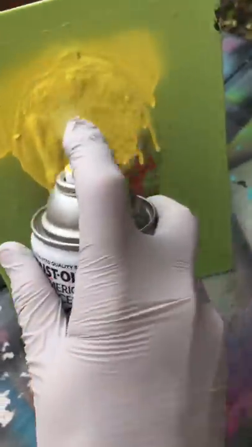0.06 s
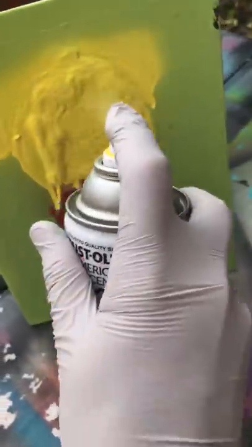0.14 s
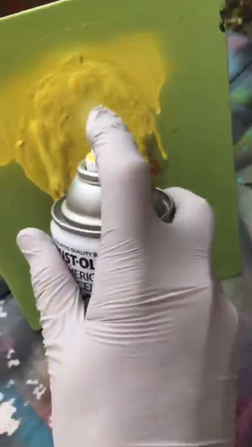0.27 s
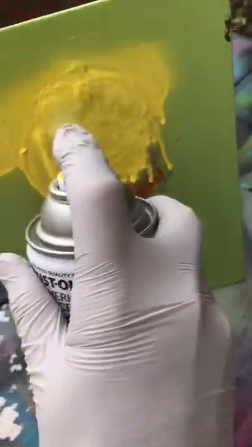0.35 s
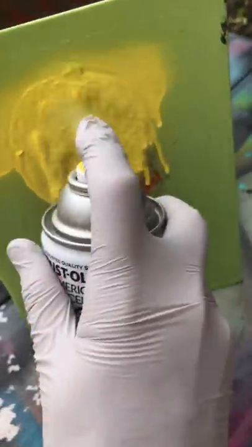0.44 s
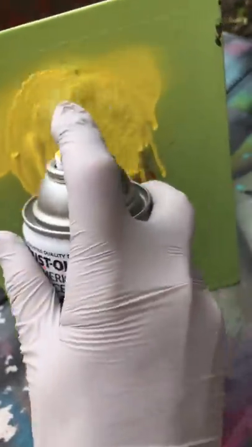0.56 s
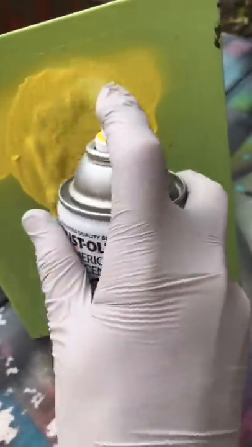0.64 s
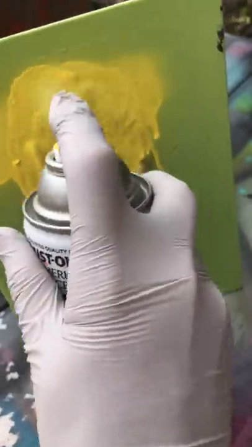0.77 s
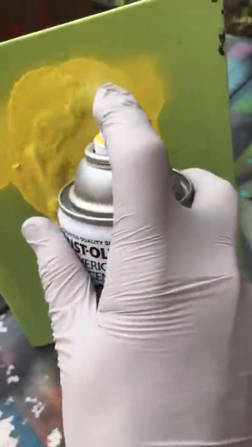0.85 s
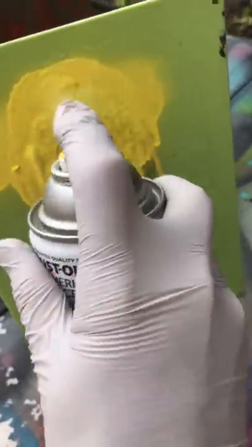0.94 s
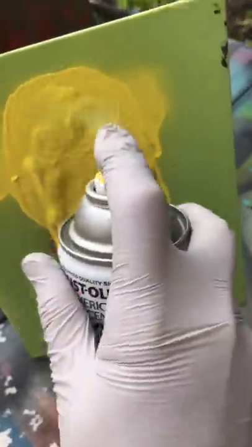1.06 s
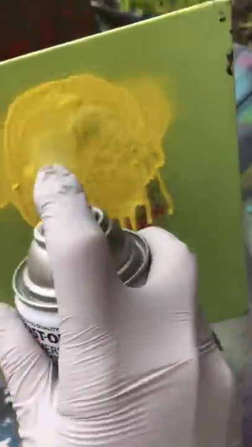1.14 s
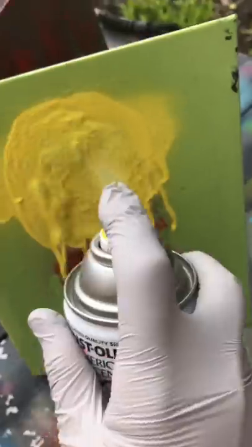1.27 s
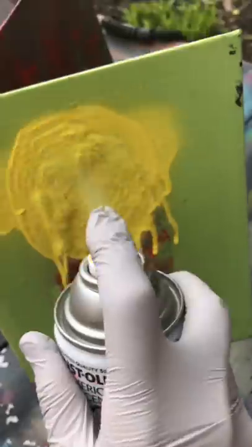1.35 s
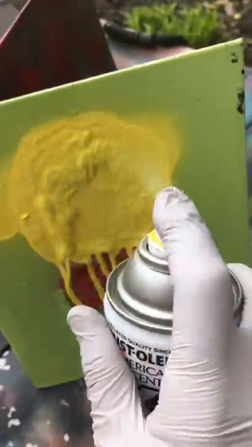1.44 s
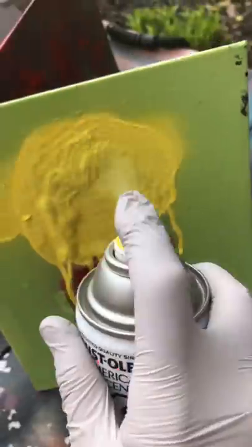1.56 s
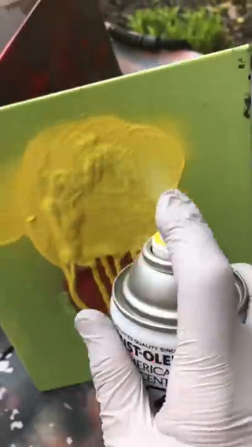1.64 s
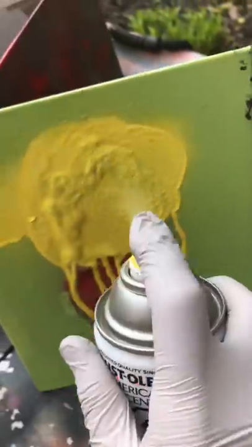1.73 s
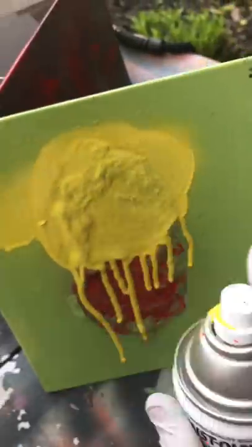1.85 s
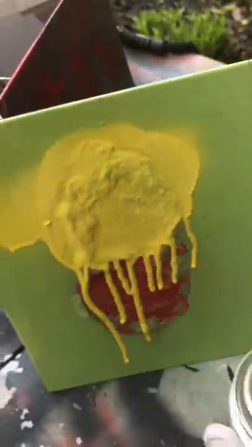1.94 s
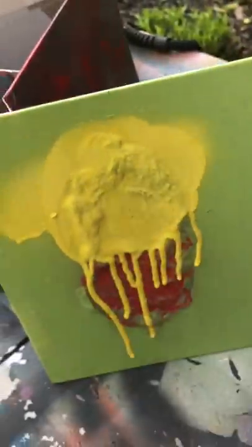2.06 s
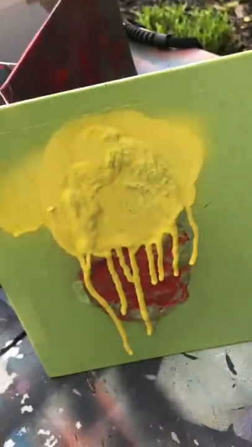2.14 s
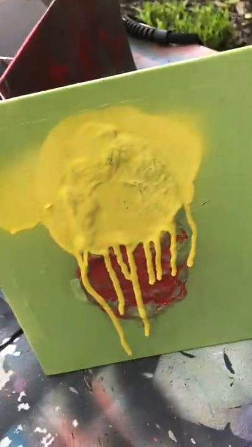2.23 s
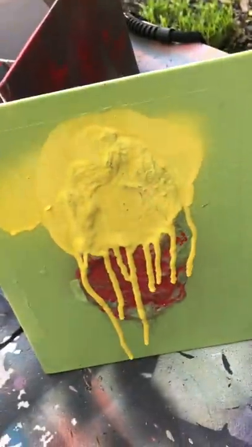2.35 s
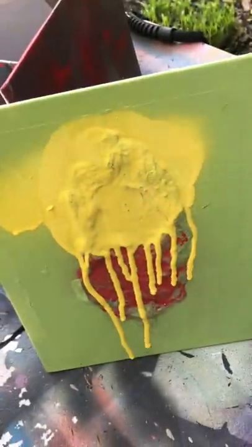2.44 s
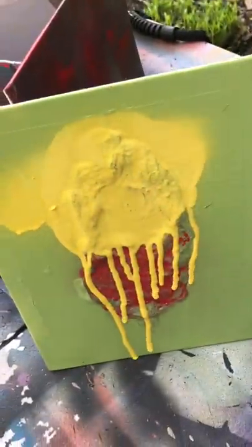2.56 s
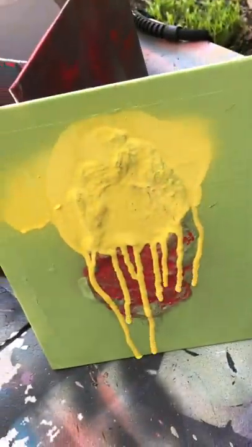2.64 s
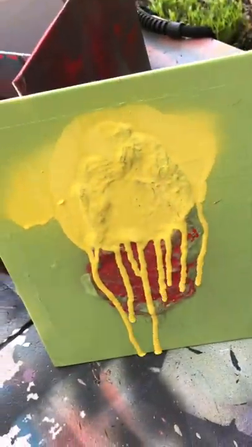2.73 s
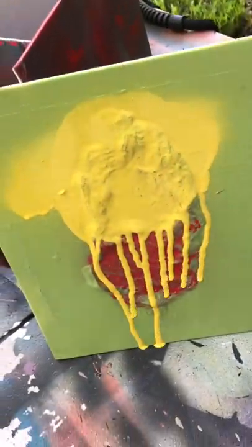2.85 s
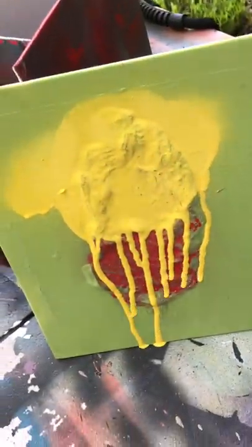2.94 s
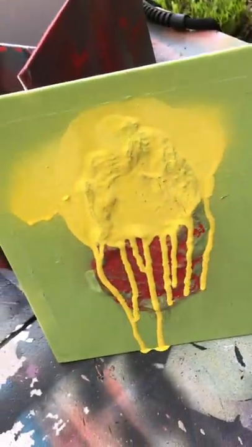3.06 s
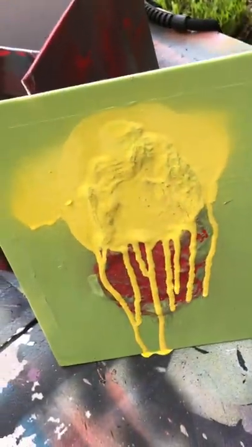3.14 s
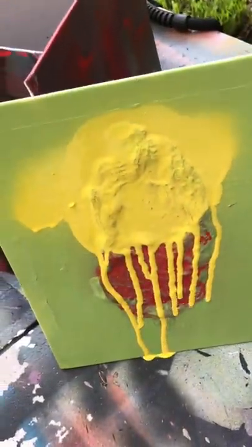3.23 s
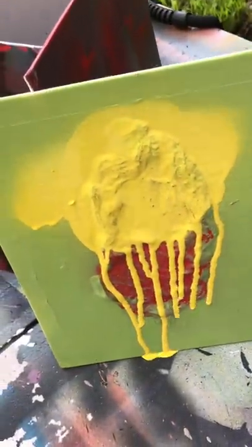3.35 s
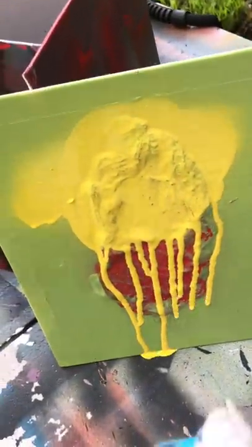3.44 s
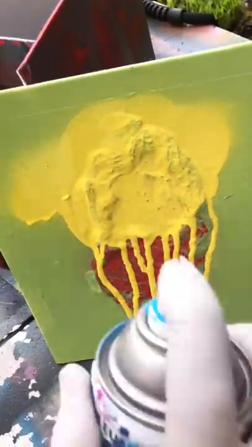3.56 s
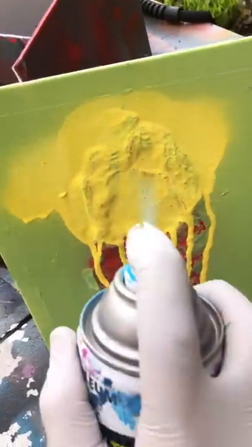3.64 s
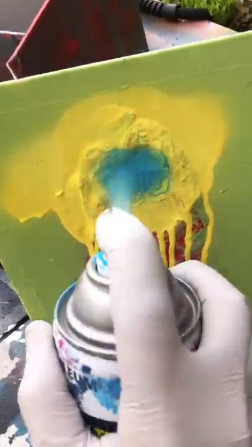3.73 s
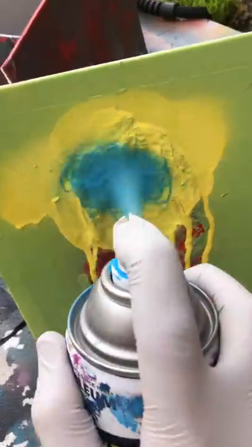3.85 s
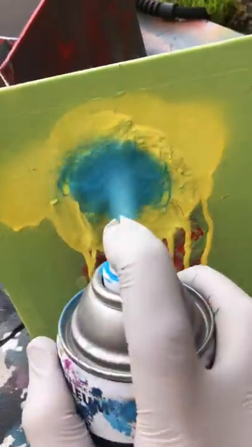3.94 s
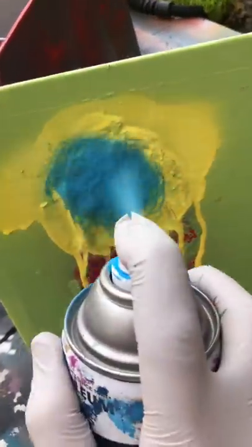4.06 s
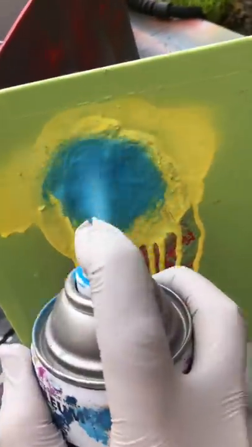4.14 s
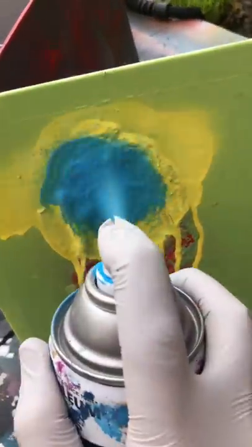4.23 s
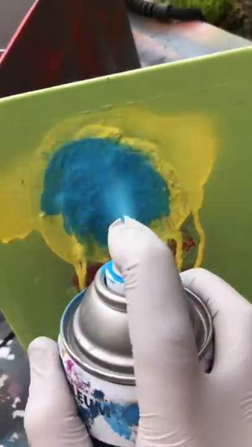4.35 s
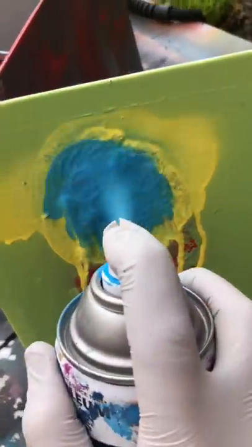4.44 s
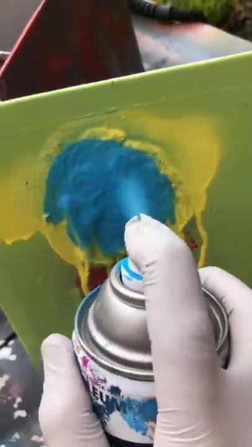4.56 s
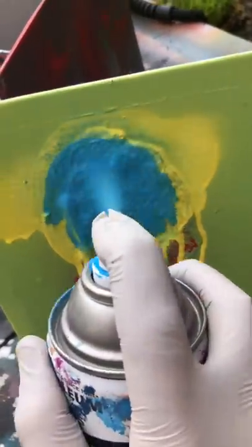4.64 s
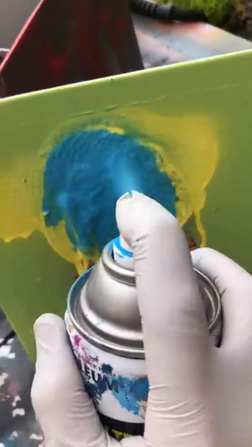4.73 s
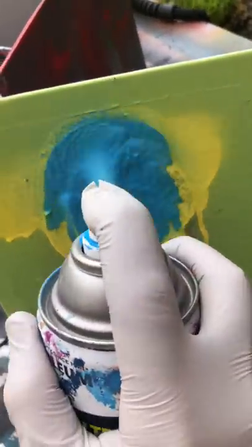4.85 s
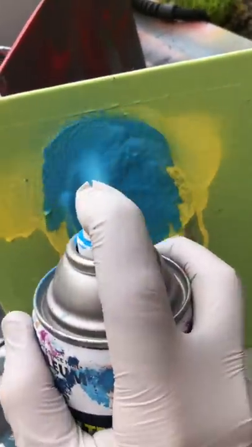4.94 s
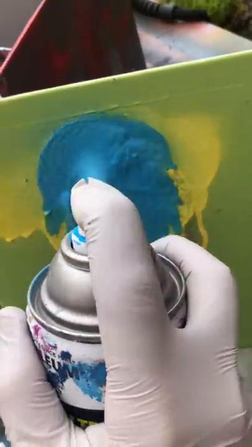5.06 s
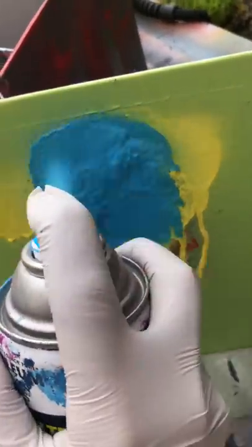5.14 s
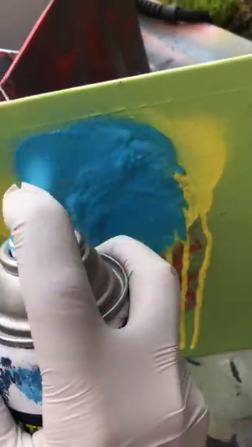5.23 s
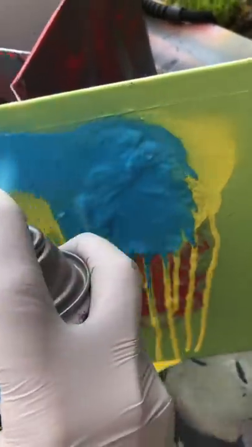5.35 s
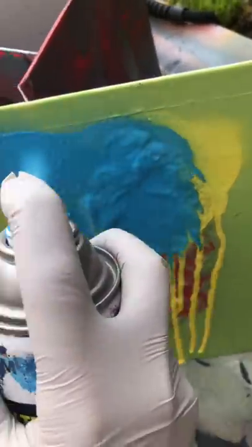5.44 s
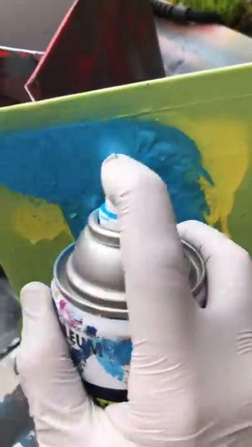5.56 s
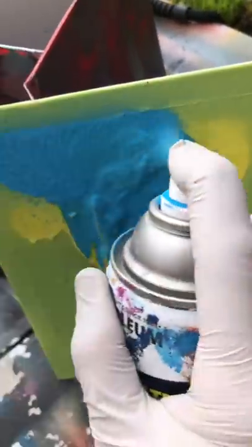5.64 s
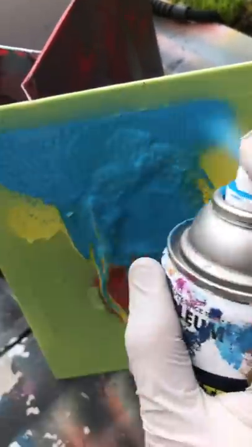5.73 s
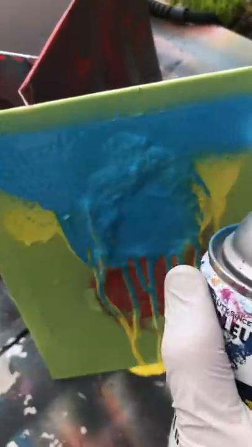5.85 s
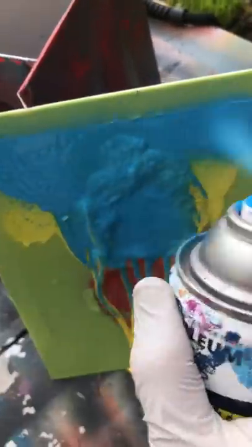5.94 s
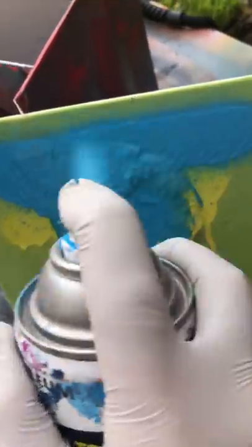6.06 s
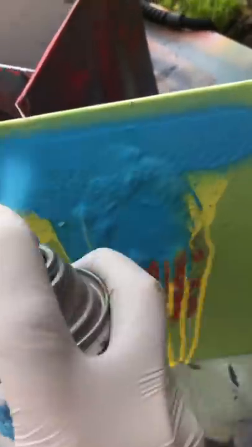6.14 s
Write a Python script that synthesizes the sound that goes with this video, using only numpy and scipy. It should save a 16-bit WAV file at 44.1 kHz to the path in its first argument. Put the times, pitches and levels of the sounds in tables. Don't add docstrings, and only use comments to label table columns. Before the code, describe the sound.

Close spray-can hissing outdoors, interrupted by a boomy set-down knock, ball clatter, far bird whistle and nozzle clicks, then a softer wavering spray.

```python
import sys
import numpy as np
from scipy import signal
from scipy.fft import rfft, irfft
from scipy.io import wavfile
from scipy.ndimage import uniform_filter1d, map_coordinates

SR = 44100
rng = np.random.default_rng(int(sys.argv[2]) if len(sys.argv) > 2 else 0)


def digitize_waveform(pressure):
    field = np.atleast_2d(pressure).T
    bounded = np.clip(field, -1, 1)
    quanta = np.round(bounded * 32767).astype(np.int16)
    wavfile.write(sys.argv[1], SR, quanta)


def makeup_ratio(level_db):
    decades = np.asarray(level_db, float) / 20
    return 10 ** decades


N = 272979
T_S = np.arange(N) / SR


def rms_one(x):
    return x / np.sqrt(np.mean(x ** 2) + 1e-20)


def in_time(rows):
    s, *columns = np.transpose(rows)
    return [np.interp(T_S, s, c) for c in columns]


def coloured(spectrum):
    hz, db = np.transpose(spectrum)
    grid_hz = np.fft.rfftfreq(N, 1 / SR) + 1
    shape_db = np.interp(np.log(grid_hz), np.log(hz), db)
    shape_db -= 24 * np.maximum(np.log2(hz[0] / grid_hz), 0)
    shape_db -= 24 * np.maximum(np.log2(grid_hz / hz[-1]), 0)
    return rms_one(irfft(rfft(rng.standard_normal(N)) * makeup_ratio(shape_db), N))


def drift(rate_hz):
    r = np.exp(-2 * np.pi * rate_hz / SR)
    return rms_one(signal.lfilter([1], [1, -2 * r, r * r], rng.standard_normal(N + SR))[SR:])


def band(x, low_hz, high_hz, order=2):
    edges_hz = [low_hz, min(high_hz, .45 * SR)]
    return signal.sosfilt(signal.butter(order, edges_hz, "band", fs=SR, output="sos"), x)


def puff(middle_s, length_s):
    return np.cos(np.pi * np.clip((T_S - middle_s) / length_s, -.5, .5))


def ring(clicks, hz, t60_s):
    r, w = makeup_ratio(-60 / (t60_s * SR)), 2 * np.pi * hz / SR
    return signal.lfilter([0, np.sin(w)], [1, -2 * r * np.cos(w), r * r], clicks + 1e-18)


def strike(times_s, levels_db, modes, spread_db, smear_s):
    at, out = (np.asarray(times_s) * SR).astype(int), np.zeros(N)
    luck = rng.standard_normal((len(at), len(modes)))
    rise = np.exp(-1 / (smear_s * SR))
    for k, (hz, db, t60_s) in enumerate(modes):
        clicks = np.zeros(N)
        clicks[at] = makeup_ratio(levels_db + db + spread_db * luck[:, k])
        push = ring(clicks, hz, 7 * smear_s) * 2 * (1 - rise)
        out += ring(push, hz, t60_s)
    return out


def crack(times_s, levels_db, t60_s, low_hz, high_hz):
    clicks = np.zeros(N)
    clicks[(np.asarray(times_s) * SR).astype(int)] = makeup_ratio(levels_db)
    fading = signal.lfilter([1], [1, -makeup_ratio(-60 / (t60_s * SR))], clicks + 1e-18)
    return band(fading * rng.standard_normal(N), low_hz, high_hz)


# f/Hz, density/dB
RUMBLE = [(25, -24), (45, -4), (62, 2.5), (90, -1.5), (157, -0.5), (230, -5), (301, -11.5), (489, -14),
          (796, -17.5), (1560, -30.5), (2690, -29.5), (4500, -34), (8000, -40), (16000, -41.5)]
# f/Hz, level/dB
HUM = [(108, -59.5), (186, -58.5), (489, -63), (610, -71), (680, -71)]
RUMBLE_DB = -46.5


def yard():
    tones = np.zeros(N)
    for hz, db in HUM:
        phase = 2 * np.pi * hz * T_S + 0.9 * drift(2.06)
        tones += makeup_ratio(db + 4 + 1.9 * drift(9.5)) * np.sin(phase)
    swell_db = 1.0 * drift(4)
    return makeup_ratio(RUMBLE_DB + swell_db) * coloured(RUMBLE) + tones


# start t/s, end t/s, top t/s, top f/Hz, level/dB
ARCHES = [
    (1.852, 2.034, 1.965, 2740, -52),
    (2.03, 2.064, 2.05, 2680, -69),
    (2.158, 2.25, 2.235, 2740, -51),
    (2.775, 2.83, 2.797, 2900, -65),
    (2.78, 2.92, 2.825, 3250, -69),
]
# start t/s, end t/s, from f/Hz, to f/Hz, level/dB
SLIDES = [
    (2.03, 2.11, 2420, 1870, -60),
    (2.26, 2.42, 2720, 2600, -63),
    (2.42, 2.69, 2620, 1900, -64),
    (2.81, 2.89, 2800, 2250, -60),
    (2.86, 2.94, 2260, 2390, -57),
    (2.93, 3.19, 2400, 1650, -61),
    (2.89, 3.0, 2900, 2620, -66),
    (3.0, 3.2, 2750, 2720, -70),
]
ARCH_HZ_PER_S2 = 60000
BIRD_WARBLE_HZ, BIRD_ECHO_T60_S, BIRD_ECHO_DB = 35, .45, -.5


def bird():
    tunes = []
    for a, b, top_s, top_hz, db in ARCHES:
        tunes.append((a, b, np.maximum(top_hz - ARCH_HZ_PER_S2 * (T_S - top_s) ** 2, 0), db))
    for a, b, first_hz, last_hz, db in SLIDES:
        tunes.append((a, b, np.interp(T_S, [a, b], [first_hz, last_hz]), db))
    flutter_db, warble_hz = 2.1 * drift(30), BIRD_WARBLE_HZ * drift(58)
    notes = np.zeros(N)
    for a, b, hz, db in tunes:
        swell = np.sqrt(abs(puff((a + b) / 2, b - a)))
        notes += makeup_ratio(db + flutter_db) * swell * np.sin(2 * np.pi * np.cumsum(hz + warble_hz) / SR)
    tail_s = np.arange(SR // 2) / SR
    tail = rng.standard_normal(len(tail_s)) * makeup_ratio(-60 * tail_s / BIRD_ECHO_T60_S)
    tail /= np.sqrt(np.sum(tail ** 2))
    return notes + makeup_ratio(BIRD_ECHO_DB) * signal.fftconvolve(notes, tail)[:N]


# middle t/s, length/s, level/dB, lowest f/Hz
RUSTLE = [(1.843, 0.2, -58, 3000), (1.966, 0.072, -61, 3000), (2.076, 0.09, -67, 3000),
          (2.38, .08, -70, 3000), (2.45, 0.033, -69, 5000), (2.566, 0.027, -64, 4000),
          (2.655, 0.073, -59.5, 3500), (2.75, 0.049, -63, 6000), (2.784, 0.021, -59, 4000),
          (2.895, 0.11, -61.5, 3000), (2.958, 0.045, -69, 4000), (3.054, 0.039, -51.5, 4770),
          (3.101, 0.066, -56, 4500), (3.18, 0.11, -61, 4000), (3.25, 0.038, -46.5, 3060),
          (3.363, 0.073, -61, 2980), (3.43, .04, -65, 7000), (3.495, 0.1, -60, 5000)]


def glove():
    noise = rng.standard_normal(N) * makeup_ratio(2.3 * drift(150))
    out = np.zeros(N)
    for s, length_s, db, low_hz in RUSTLE:
        out += makeup_ratio(db) * puff(s, length_s) * rms_one(band(noise, low_hz, 13700))
    return out


# t/s, peak level/dB, ring f/Hz
NOZZLE = [(2.024, -43, 2600), (2.457, -38, 1520), (2.7806, -43, 2870), (3.3054, -54, 4240),
          (3.4017, -46, 5050), (3.4274, -49, 5580), (3.48, -45, 5880), (3.496, -44, 4040),
          (3.5089, -38, 3910), (3.5426, -33, 2510), (3.5696, -8.5, 2500), (3.5825, -14.5, 6200)]
# t/s, peak level/dB, ring f/Hz
LIFT = [
    (3.337, -28, 1250),
    (3.341, -31, 1650),
    (3.362, -34, 1310),
    (3.329, -46, 4300),
    (3.339, -30, 4300),
    (3.355, -36, 4280),
    (3.374, -40, 4300),
    (3.383, -45, 4300),
]


def nozzle():
    s, peak_db, _ = np.transpose(NOZZLE)
    out = crack(s, peak_db - 6, 0.01, 1700, 16000)
    for s, peak_db, hz in NOZZLE + LIFT:
        modes = [(hz, 0, .008), (1.98 * hz, -6, .006)]
        out += strike([s], peak_db - 4, modes, spread_db=1.5, smear_s=0.00037)
    return out


# t/s, peak level/dB
BALL = [(2.1336, -29), (2.142, -23), (2.1454, -29.5), (2.176, -24), (2.2004, -25), (2.2233, -27),
        (2.2448, -28), (2.2623, -32), (2.2731, -23), (2.2754, -46), (2.2929, -30), (2.3084, -32),
        (2.3204, -32.5), (2.332, -35), (2.338, -35), (2.346, -38), (3.3364, -24), (3.3605, -36),
        (3.3804, -44)]
# f/Hz, level/dB, t60/s
CAN = [(1250, -15, .02), (1650, -14, .02), (2700, -10, .02), (3100, -9, .02), (4220, -1, .022),
       (4380, -2, .022), (6280, -9, .055), (6450, -9, .055), (7250, -3, .03), (8850, -3, .025),
       (10400, -5, .022), (12200, -5, .02), (14000, -11, .014)]


def mixing_ball():
    s, peak_db = np.transpose(BALL)
    tick = crack(s, peak_db - 6, .011, 1800, 15000)
    clatter = crack(s, peak_db - 15, .04, 2500, 13000)
    return tick + clatter + strike(s, peak_db - 13, CAN, spread_db=4, smear_s=0.00053)


# t/s, crack peak level/dB, table re crack level/dB
KNOCKS = [(2.1159, -11, 1), (2.122, -23, 5), (2.1456, -26.5, -1), (2.331, -36.5, 0.5), (2.3668, -47, 8),
          (2.4196, -48, 5), (2.4444, -27, 6), (2.516, -44, 13.5), (2.5226, -33, 3), (2.583, -26.5, -2),
          (2.6094, -51, 19), (2.6362, -44, 13), (2.706, -44, 6)]
# f/Hz, level/dB, t60/s
TABLE_MODES = [(143.8, -2.5, 0.18), (163, -5, 0.085), (210.6, -6, 0.15), (252, -3, 0.044),
               (294, -11.5, 0.11), (443, -9.5, 0.05), (582, -9, 0.085), (797, -35, 0.068),
               (940, -25, 0.025), (1070, -12, 0.017), (1460, -16, 0.0086)]
# f/Hz, level/dB, t60/s
RIM_MODES = [(1220, 4, 0.007), (1610, -7, 0.013), (2970, -9, 0.044), (3180, 6.5, 0.008), (3360, 2, 0.0074),
             (3530, 0, 0.0093), (4020, -6, 0.013), (5000, -3.5, 0.0052)]
# t/s, level/dB
ROCKING = [
    (2.2, -31),
    (2.338, -32),
    (2.458, -32),
    (2.528, -34),
    (2.62, -29),
]
ROCK_RISE_DB_PER_S, ROCK_FALL_DB_PER_S = 450, 248


def set_down():
    s, peak_db, table_db = np.transpose(KNOCKS)
    rock = np.zeros(N)
    for at, db in ROCKING:
        slope_db = np.minimum(ROCK_RISE_DB_PER_S * (T_S - at), ROCK_FALL_DB_PER_S * (at - T_S))
        rock += makeup_ratio(db + slope_db)
    rock *= rng.standard_normal(N)
    hum = sum(ring(rock, hz, t60_s) * makeup_ratio(db - 30) for hz, db, t60_s in TABLE_MODES[:5])
    boom = strike(s + .001, peak_db + table_db - 1, TABLE_MODES, spread_db=5, smear_s=0.0037)
    thud = crack(s, peak_db + table_db + 6.0, 0.086, 220, 780)
    rattle = crack(s, peak_db - 19.5, 0.11, 1400, 5600) + crack(s, peak_db - 20, 0.017, 1500, 16000)
    rim = strike(s, peak_db - 5, RIM_MODES, spread_db=1.5, smear_s=.0006)
    return boom + hum + thud + rattle + rim


def by_can(pair):
    return np.where(T_S < 2.7, *pair)


def evened(x):
    return x / np.sqrt(uniform_filter1d(x ** 2, size=SR // 8))


def reflected(x, kind, hz):
    return signal.filtfilt(*signal.butter(1, hz, kind, fs=SR), x)


TREMBLE_CM, CM_PER_S = .06, 34300
WAVER = .12


def echo(x, cm, strength):
    late = (cm + TREMBLE_CM * drift(36)) / CM_PER_S * SR
    gain = np.clip(strength * (1 + WAVER * drift(14)), 0, 1)
    return gain * map_coordinates(x, [np.arange(N) - late], order=5, mode="nearest")


# t/s, jet level/dB
PRESSURE = [
    [(0.0, -19.5), (0.058, -20), (0.576, -19), (0.778, -19), (1.28, -16.5), (1.77, -18)],
    [(3.59, -24.5), (3.68, -20), (4.91, -21), (5.38, -23), (5.54, -22), (5.8, -28), (6.01, -23),
     (6.17, -24.5), (6.19, -23.5)],
]
USUAL_DB = -19


def pressure_db():
    return in_time(PRESSURE[0] + PRESSURE[1])[0] - USUAL_DB


VALVE_SHUT_S, VALVE_OPEN_S, SHUT_T60_S, OPEN_RISE_S = 1.805, 3.574, 0.024, 0.01
LEAK_DB, LEAK_T60_S = -24, 0.16


def valve():
    after_s = np.clip(T_S - VALVE_SHUT_S, 0, 1)
    shut = makeup_ratio(-60 * after_s / SHUT_T60_S) + makeup_ratio(LEAK_DB - 60 * after_s / LEAK_T60_S)
    return by_can((shut, np.clip((T_S - VALVE_OPEN_S) / OPEN_RISE_S, 0, 1)))


# t/s, extra board path/cm, board echo/0-1, hand turned to microphone/0-1
HOLD = [
    [(0, 15.6, .5, 0), (.17, 13.55, .55, 0), (.3, 13.2, .52, 0), (.39, 13.65, .5, 0), (.5, 13.15, .48, 0),
     (1.12, 12.4, .54, 0), (1.28, 11.95, .62, 0), (1.52, 11.9, .6, 0), (1.67, 10.95, .55, 0),
     (1.8, 11.95, .62, 0)],
    [(3.6, 14.2, .2, 0), (3.74, 12.7, .5, 0), (3.88, 13.25, .5, 0), (4.66, 12.2, .55, 0),
     (5.0, 11.15, .45, .85), (5.4, 10.35, .33, 1), (5.6, 10.25, .3, 1), (5.9, 13.3, .16, .85),
     (6.0, 14.1, .13, 0)],
]
# f/Hz, density/dB
JET = [(3000, -43), (4600, -19), (5100, -15.5), (5600, -8.5), (7000, -3.5), (9000, -4.5), (12000, -6),
       (14500, -6.5), (16500, -3.5)]
# f/Hz, density/dB
SPLASH = [(300, -9), (600, -14.5), (1100, -9), (1700, -7), (2400, -1), (2650, -1), (3400, -1), (4200, -5),
          (4700, -5), (5500, -8)]
JET_TRIM_DB, EASING_S, EASING_DB = 1.59, 0.046, -7
TREBLE_HZ, TREBLE_DB, TREBLE_FOLLOWS = 10000, 10.5, 2
SPLASH_DB, SPLASH_FOLLOWS, SPLASH_TURNED_DB = -41, 0.2, 1.5
SPLASH_LOW_UNTIL_S, SPLASH_LOW_DB = 3.3, -3
CIRCLE_CM, CIRCLE_S, FARTHEST_S = (.22, .1), (.186, .21), (.38, 3.87)
BRIGHT_ECHO_HZ, ECHO_GAIN, DULL_ECHO_HZ = 5000, 1.4, 6000
HAND_RATIO, HAND_ECHO, HAND_PER_CM, NEAR_CM = 1.41, (.07, .13), .09, 12.8
THUMB_RATIO, THUMB_ECHO, THUMB_LOW_HZ = 1.62, (.03, .24), 7500
WRIST_CM, WRIST_FOLLOWS, WRIST_TURNED = 5.2, 1.3, .85
FOREARM_CM, FOREARM_ECHO = 30.5, 0.043
TABLE_TOP_CM, TABLE_TOP_ECHO, TABLE_TOP_TURNED = (41.4, 45.5), 0.35, -0.26
PALM_LOW_HZ, PALM_HIGH_HZ, PALM_ECHO, PALM_TURNED = 4000, 5760, 0.27, -0.14
PALM_BEYOND_CM, PALM_FARTHEST_CM = (6.1, 4.6), (19.6, 17.2)


def spray():
    push_db = pressure_db() + JET_TRIM_DB
    push_db = push_db + by_can((EASING_DB, 0)) * np.clip(1 + (T_S - VALVE_SHUT_S) / EASING_S, 0, 1)
    board_cm, board, turned = in_time(HOLD[0] + HOLD[1])
    circle = np.cos(2 * np.pi * (T_S - by_can(FARTHEST_S)) / by_can(CIRCLE_S))
    board_cm = board_cm + (1 - turned) * by_can(CIRCLE_CM) * circle

    sputter_db = .5 * drift(23) + 0.21 * drift(560)
    jet = coloured(JET) * makeup_ratio(sputter_db)
    treble = makeup_ratio(TREBLE_DB + TREBLE_FOLLOWS * push_db)
    jet = jet + (treble - 1) * reflected(jet, "high", TREBLE_HZ)
    splash = coloured(SPLASH) * makeup_ratio(1.3 * sputter_db + 0.63 * drift(5.1))

    bright = ECHO_GAIN * (jet + reflected(jet, "high", BRIGHT_ECHO_HZ)) / 2
    dull = reflected(reflected(jet, "low", DULL_ECHO_HZ), "low", DULL_ECHO_HZ)
    short_waves = reflected(splash, "high", 2500)

    hand = by_can(HAND_ECHO) + HAND_PER_CM * np.maximum(NEAR_CM - board_cm, 0)
    thumb_sound = reflected(bright, "high", THUMB_LOW_HZ)
    jet = jet + echo(bright, board_cm, board) + echo(bright, HAND_RATIO * board_cm, hand)
    jet = jet + echo(thumb_sound, THUMB_RATIO * board_cm, by_can(THUMB_ECHO))

    arm_cm = np.where(turned > .4, WRIST_CM + WRIST_FOLLOWS * board_cm, FOREARM_CM)
    arm = np.maximum(WRIST_TURNED * (turned - .4) / .6, FOREARM_ECHO * (.4 - turned) / .4)
    table_top = TABLE_TOP_ECHO + TABLE_TOP_TURNED * turned
    for cm, strength in [(arm_cm, arm), (by_can(TABLE_TOP_CM), table_top)]:
        jet = jet + echo(dull, cm, strength)
        splash = splash + echo(short_waves, cm, strength)

    splash_db = SPLASH_DB + SPLASH_FOLLOWS * push_db + SPLASH_TURNED_DB * turned
    splash_db = splash_db + by_can((0, SPLASH_LOW_DB)) * (T_S < SPLASH_LOW_UNTIL_S)
    both = makeup_ratio(USUAL_DB + push_db) * evened(jet) + makeup_ratio(splash_db) * evened(splash)

    palm_band = signal.butter(2, [PALM_LOW_HZ, PALM_HIGH_HZ], "band", fs=SR, output="sos")
    palm_cm = np.minimum(board_cm + by_can(PALM_BEYOND_CM), by_can(PALM_FARTHEST_CM))
    palm = echo(signal.sosfiltfilt(palm_band, both), palm_cm, PALM_ECHO + PALM_TURNED * turned)
    return valve() * (both + palm)


def scene():
    mono = yard() + bird() + glove() + nozzle() + mixing_ball() + set_down() + spray()
    return np.stack([mono, mono])


# t/s, middle f/Hz
FILLS = [(1.006, 9500), (1.006, 10600), (3.746, 6200), (4.28, 10500), (4.28, 15200), (4.327, 7900),
         (4.582, 8300), (4.582, 11700), (4.954, 7600), (5.557, 7550), (5.557, 12300), (5.604, 11700),
         (5.975, 11000), (6.161, 8900)]
FILL_WIDTH_HZ, FILL_DB, FILL_FOLLOWS = 1600, -31.5, 1.5


def side_noise():
    noise, parted = rng.standard_normal(N), np.zeros(N)
    for s, hz in FILLS:
        strip = band(noise, hz - FILL_WIDTH_HZ / 2, hz + FILL_WIDTH_HZ / 2, order=6)
        parted += puff(s, .046) * rms_one(strip)
    return makeup_ratio(FILL_DB + FILL_FOLLOWS * pressure_db()) * parted * [[1], [-1]]


def low_pass(x):
    return signal.sosfilt(signal.butter(12, 17070, fs=SR, output="sos"), x)


CUTOFF_HZ, MIC_LOW_HZ = 16050, 45


def record(dry):
    steep = signal.cheby2(20, 45, CUTOFF_HZ, fs=SR, output="sos")
    mic = signal.butter(4, MIC_LOW_HZ, "high", fs=SR, output="sos")
    mix = signal.sosfilt(mic, signal.sosfilt(steep, dry + side_noise()))
    return low_pass(mix)


dry = scene()
out = record(dry)
digitize_waveform(out)
```